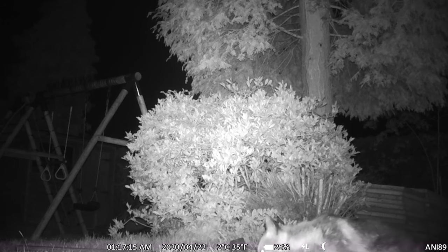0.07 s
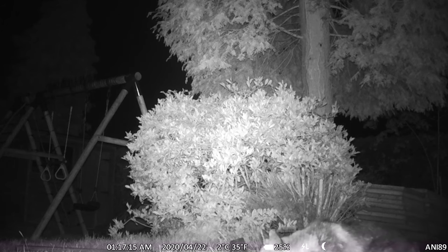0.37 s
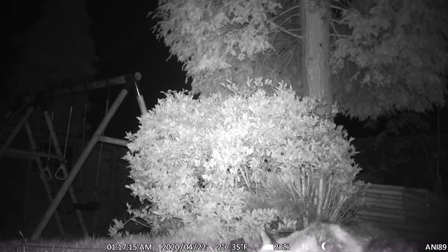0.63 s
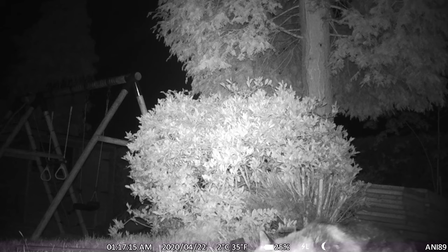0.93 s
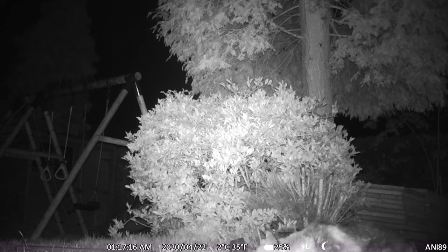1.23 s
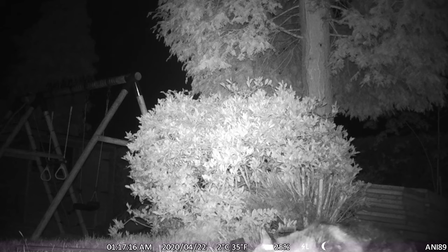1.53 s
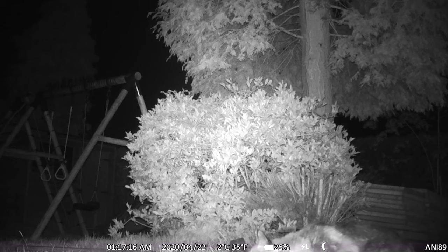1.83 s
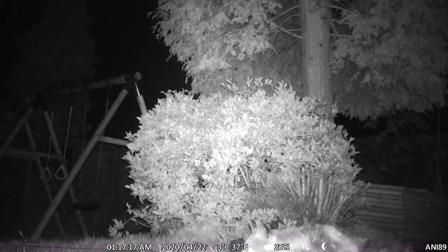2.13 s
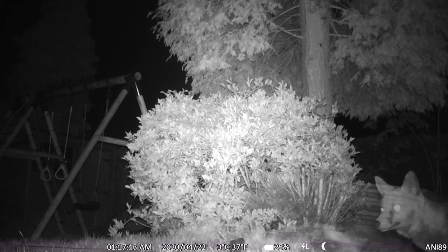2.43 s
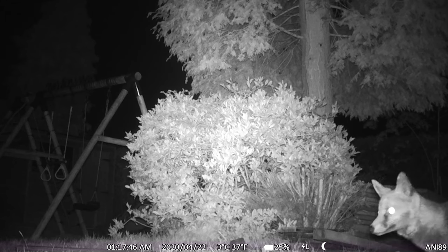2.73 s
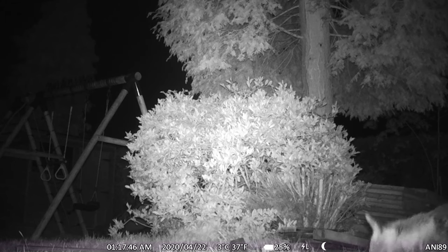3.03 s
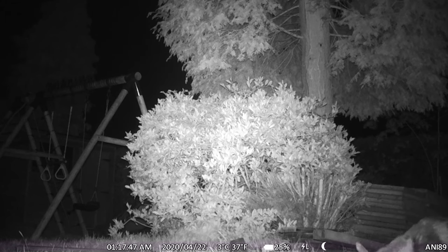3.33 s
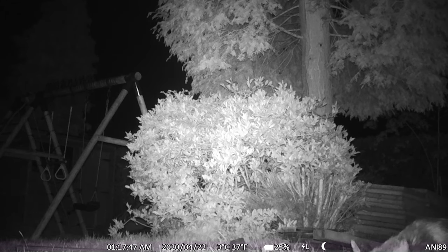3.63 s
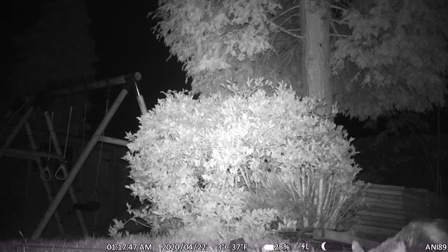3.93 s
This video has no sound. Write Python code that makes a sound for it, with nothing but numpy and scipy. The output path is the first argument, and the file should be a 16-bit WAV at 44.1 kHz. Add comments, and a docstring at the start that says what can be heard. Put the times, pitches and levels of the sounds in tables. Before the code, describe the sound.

A low rumble like distant traffic lies under a wildlife camera's steady, dull microphone hiss in a garden at night. A fox faintly rustles the grass a few times, then one dry click sounds and the background continues.

```python
"""A garden at night

A distant rumble, probably traffic, lies under the steady hiss of a wildlife camera's microphone,
which picks up little treble. A fox stirs the grass, making faint bursts of tiny crackles.
With one click the sound skips to a later moment of the night, where the hiss is slightly softer."""
import sys
import numpy as np
from scipy.fft import rfft, irfft
from scipy.io import wavfile

SR = 44100
rng = np.random.default_rng(int(sys.argv[2]) if len(sys.argv) > 2 else 0)


def generate_wav(signal):
    """Clip the signal to [-1, 1] and save it as 16-bit WAV at the path in sys.argv[1]."""
    frames = np.transpose(np.atleast_2d(signal))
    scaled = np.clip(frames, -1, 1) * 32767
    pcm = np.round(scaled).astype(np.int16)
    wavfile.write(sys.argv[1], SR, pcm)


N = 176400   # 4 seconds
SKIP_S = 2.5179   # when the later moment begins
MICROPHONE_TOP_HZ = 3813


def from_db(db):
    """Turn decibels into a number to multiply a sound by."""
    return 10 ** (np.asarray(db) / 20)


def rms_one(x):
    """Scale a sound so that its average strength (rms) is 1."""
    return x / np.sqrt(np.mean(x ** 2) + 1e-20)


def filtered(x, response):
    """Turn each frequency f up or down by the factor response(f)."""
    hz = np.maximum(np.fft.rfftfreq(N, 1 / SR), 1)
    return irfft(rfft(x) * response(hz), N)


def low_pass(x, edge_hz, order):
    """Keep what lies below the edge; a higher order removes the rest more sharply."""
    return filtered(x, lambda f: 1 / np.sqrt(1 + (f / edge_hz) ** (2 * order)))


def coloured(x, spectrum):
    """Give a sound the tone colour in a table, within the microphone's range, at strength 1."""
    hz, db = np.transpose(spectrum)
    shaped = filtered(x, lambda f: from_db(np.interp(np.log(f), np.log(hz), db)))
    return rms_one(low_pass(shaped, MICROPHONE_TOP_HZ, order=41.4))


def across_skip(before, after, t):
    """Switch from before to after within a few milliseconds of the skip."""
    share = .5 + .5 * np.tanh((t - SKIP_S) / .001)
    return (1 - share) * before + share * after


def microphone_hiss(t):
    """The microphone makes its own even noise, a little softer after the skip."""
    # tone colour of the hiss: f/Hz, level/dB
    hiss_colour = [(300, -6.5), (900, 0), (1400, 1), (2000, 0.46), (2700, -1.5), (3300, -2), (3700, -5),
                   (4000, -6)]
    level_db = across_skip(before=-38.5, after=-39, t=t)
    return from_db(level_db) * coloured(rng.standard_normal(N), hiss_colour)


def far_drone(pitch_hz=53.3, width_hz=6.7):
    """Noise narrowed to around one low pitch makes a wavering hum."""
    hum = filtered(rng.standard_normal(N), lambda f: 1 / (1 + ((f - pitch_hz) / width_hz) ** 2))
    return from_db(-32.5) * rms_one(hum)


def distant_rumble(t):
    """Dull noise, probably far traffic, in three pitch ranges that each swell and sink."""
    # tone colour of the rumble before and after the skip: f/Hz, level/dB
    early_colour = [(8.8, -39), (15, -6.5), (49, -3.5), (65, -0.5), (104, -10), (131, -7), (187, -5.5),
                    (226, -7.5), (263, -15.5), (301, -13), (378, -16), (432, -20.5), (522, -17), (643, -22),
                    (734, -20), (958, -24.5), (1400, -28.5), (1820, -61.5), (3080, -120)]
    late_colour = [(8.8, -42), (15, -33), (22, -10), (43, -7.5), (60, -1.5), (102, -6), (146, -10.5),
                   (210, -9.5), (269, -18.5), (307, -16), (393, -17.5), (466, -23.5), (493, -20),
                   (707, -22.5), (792, -22), (940, -26.5), (1400, -31), (1820, -59), (3080, -120)]
    # how the deep bass, upper bass and low middle rise and fall: t/s, level/dB
    deep_swells = [(0, 0.5), (1.05, -1), (1.3, 1), (2.05, -0.5), (2.33, 2), (2.58, -2.5), (2.77, 0),
                   (2.88, -3), (3.33, -3), (3.6, 3.5), (3.88, -2.5)]
    upper_swells = [(0, -0.5), (.42, -0.5), (.56, 3.5), (.72, 0.5), (1.35, 2), (1.55, -1), (1.92, -2.5),
                    (2.1, 1.5), (2.4, -2), (2.7, 0), (4, -1.5)]
    middle_swells = [(0, .3), (.9, 1), (1.65, -0.5), (1.98, 1.5), (2.35, -0.5), (2.5, -2), (2.9, 0),
                     (3.45, 0.1), (3.8, -1)]
    before = from_db(-26) * coloured(rng.standard_normal(N), early_colour)
    after = from_db(-25.5) * coloured(rng.standard_normal(N), late_colour)
    rumble = low_pass(across_skip(before, after, t), edge_hz=1104, order=3)   # distance dulls it
    rumble += far_drone()
    deep = low_pass(rumble, edge_hz=110, order=6)
    bass = low_pass(rumble, edge_hz=260, order=6)
    ranges = [(deep, deep_swells), (bass - deep, upper_swells), (rumble - bass, middle_swells)]
    return sum(band * from_db(np.interp(t, *np.transpose(swells))) for band, swells in ranges)


def grass_rustles(t, crackles_per_s=1500):
    """A fox stirs the grass: each rustle is a brief swell of many tiny crackles."""
    # one row for each rustle: peak t/s, length/s, level/dB
    rustles = [(0.458, .02, -38.5), (0.513, .014, -40), (0.604, .015, -42), (.63, .01, -39.5),
               (1.32, .05, -47), (1.816, 0.0083, -36.5), (1.864, 0.028, -36.5), (1.947, .012, -40.5),
               (2.31, 0.023, -43)]
    # tone colour of the grass: f/Hz, level/dB
    grass_colour = [(1000, -10), (2000, -8), (2600, 3.5), (3100, 2), (3900, -3)]
    signs = rng.choice([-1, 1], N)
    ticks = signs * (rng.random(N) < crackles_per_s / SR)
    swells = sum(from_db(db) * np.exp(-2 * ((t - peak) / length) ** 2) for peak, length, db in rustles)
    return swells * coloured(ticks, grass_colour)


def skip_click(t, settle_s=0.001):
    """The signal jumps at the skip and settles, making one dry, bright tick."""
    jump = .5 * np.sign(t - SKIP_S) * np.exp(-np.abs(t - SKIP_S) / settle_s)
    return from_db(-15) * low_pass(jump, edge_hz=14000, order=1)


def scene():
    """Mix rumble, hiss, rustles and the click into one channel."""
    t = np.arange(N) / SR
    background = distant_rumble(t) + microphone_hiss(t)
    dip_db = -2.5 * np.exp(-((t - 2.54) / 0.074) ** 2)   # the level dips briefly around the skip
    return (from_db(dip_db) * background + grass_rustles(t) + skip_click(t))[None]


def record(dry):
    """Add a very faint, bright hiss and remove the highest treble."""
    faint_hiss = from_db(-71.5) * rng.standard_normal(N)
    return low_pass(dry + faint_hiss, edge_hz=15750, order=150)


dry = scene()
out = record(dry)
generate_wav(out)
```